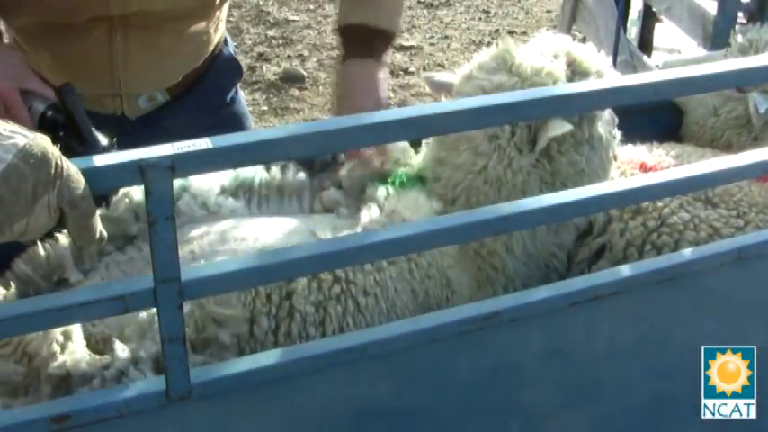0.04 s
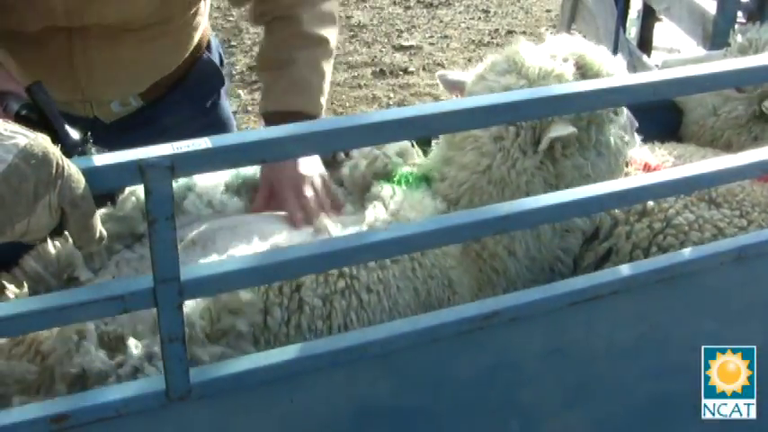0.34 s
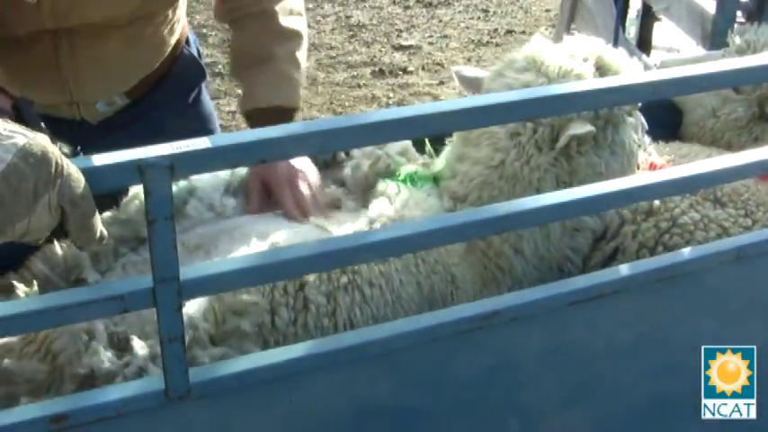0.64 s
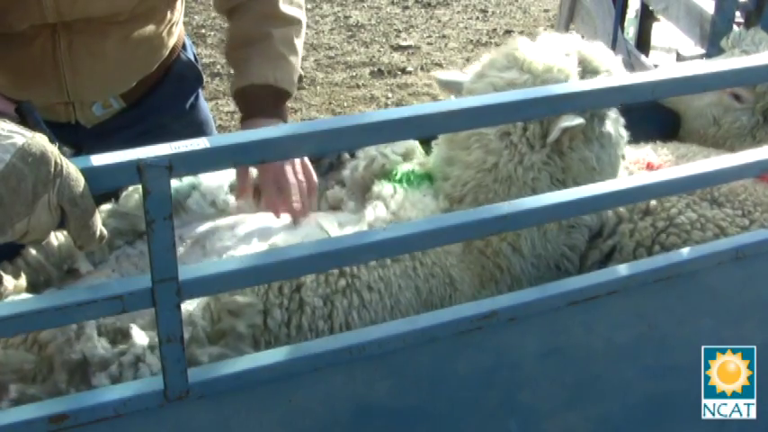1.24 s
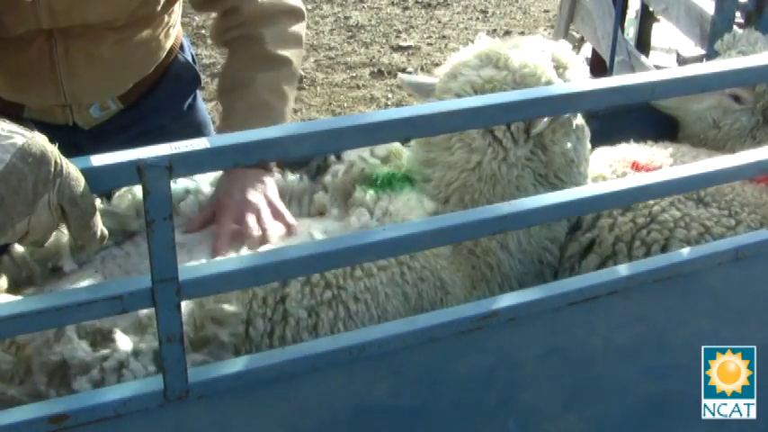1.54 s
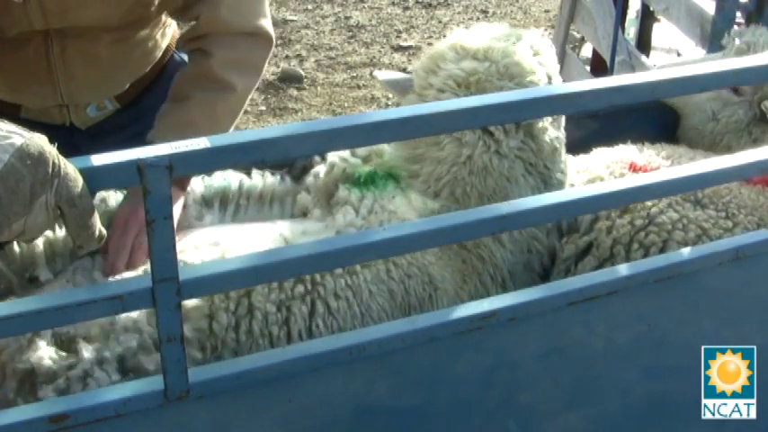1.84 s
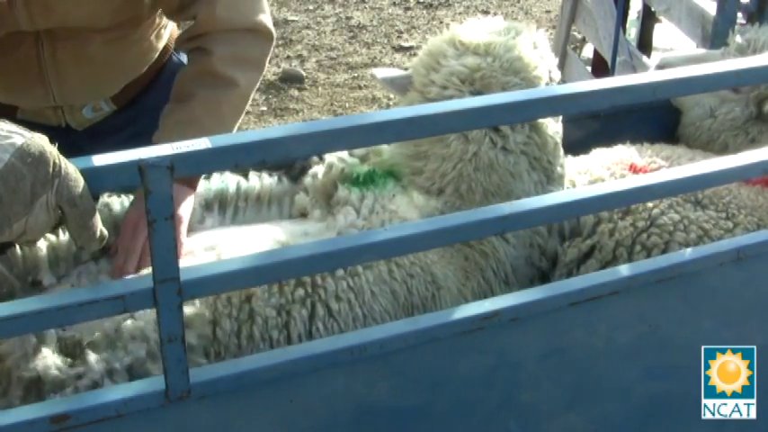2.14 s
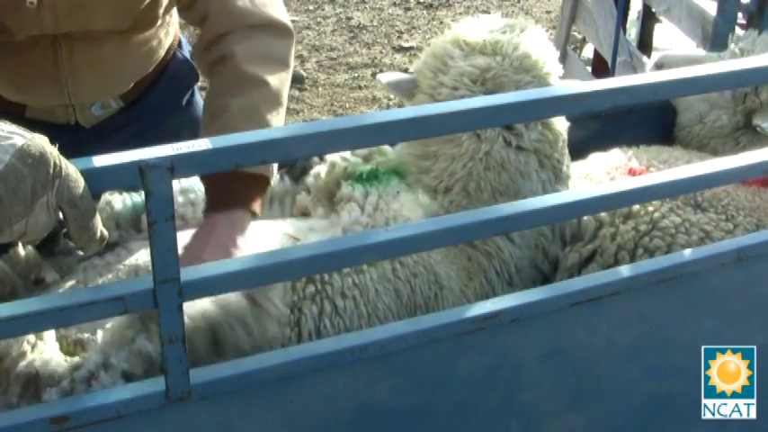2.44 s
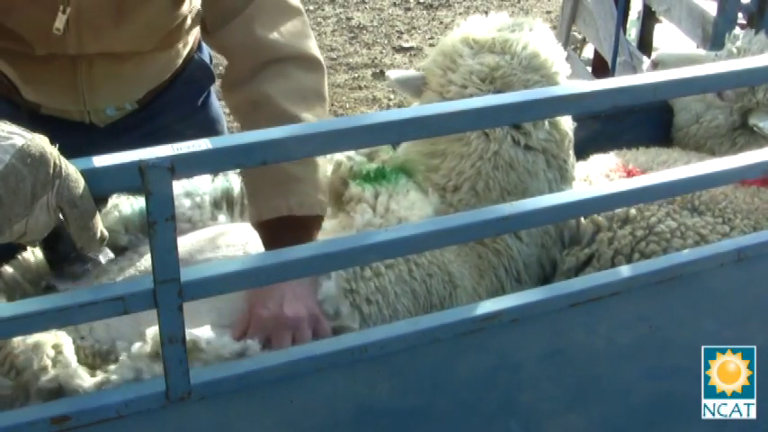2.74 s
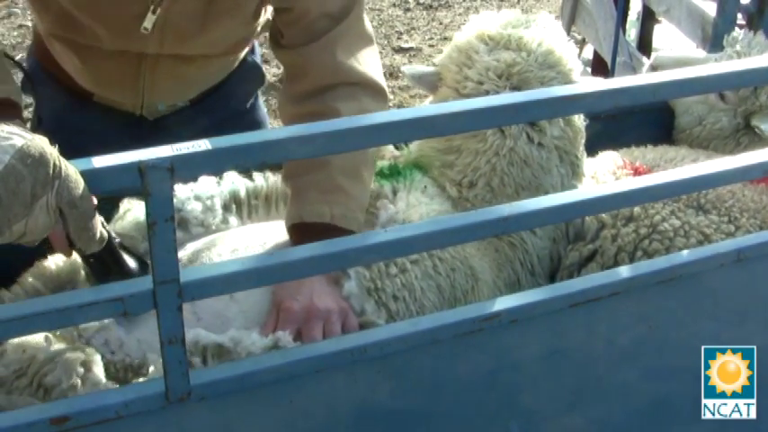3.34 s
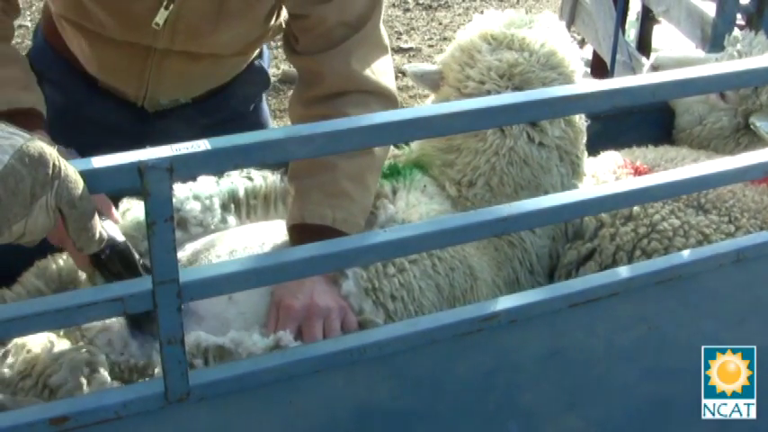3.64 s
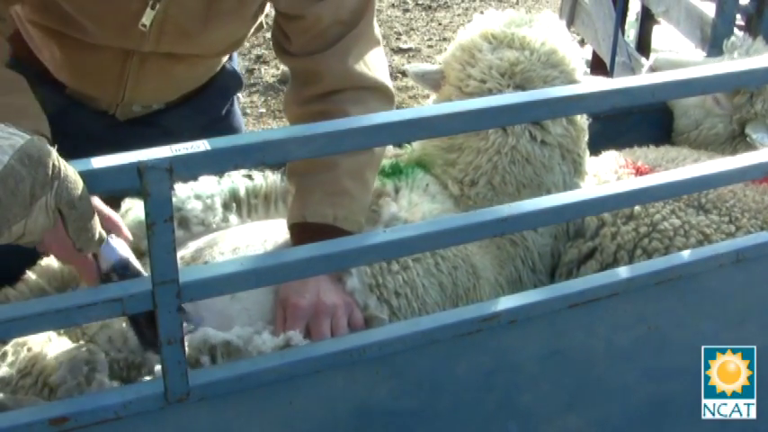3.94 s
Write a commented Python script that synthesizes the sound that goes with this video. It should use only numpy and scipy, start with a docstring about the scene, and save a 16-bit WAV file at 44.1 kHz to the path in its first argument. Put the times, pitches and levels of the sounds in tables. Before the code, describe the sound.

Electric sheep shears run close by throughout, with a steady high motor whine over a fast, rasping metallic buzz. From about 2.3 seconds a coarser rasp swells as the blades cut into wool. Around 3.5 seconds the sound dips for an instant and the whine sags slightly, then recovers. Wind rumbles on the microphone in uneven gusts, strongest from about 3.3 seconds to near the end.

```python
"""An outdoor pen, with electric sheep shears running close by.
The motor fan whines at its blade-passing frequency. A reduction gear drives the cutter to and fro
over the comb: sliding friction rasps, and impacts knock in every stroke. The motor slows under load
as the blades bite into the fleece. Turbulent gusts of wind rumble on the microphone."""
import sys
import numpy as np
from scipy import signal
from scipy.fft import rfft, irfft
from scipy.io import wavfile
from scipy.ndimage import uniform_filter1d

SR = 44100
rng = np.random.default_rng(int(sys.argv[2]) if len(sys.argv) > 2 else 0)


def wrap_up_sound(samples):
    """Save the sound to the file named by the first command line argument, as 16-bit audio."""
    columns = np.atleast_2d(samples).T
    # keep every value between -1 and 1, then stretch to whole-number steps
    tamed = np.clip(columns, -1, 1)
    steps = np.round(tamed * 32767).astype(np.int16)
    wavfile.write(sys.argv[1], SR, steps)


N = 176400

# Blade-passing frequency of the fan, proportional to motor speed (t/s, f/Hz)
FAN_PITCH = [(0, 2841), (.25, 2851), (.45, 2849), (.75, 2855), (1.15, 2850), (1.38, 2860), (1.7, 2855),
             (2.0, 2856), (2.2, 2861), (2.49, 2849), (2.7, 2860), (3.02, 2858), (3.4, 2836), (3.55, 2818),
             (3.68, 2821), (3.9, 2851), (4, 2853)]
# Relative level of the whine as the handpiece turns (t/s, level/dB)
FAN_LEVEL = [(0.0, -29.5), (0.03, -34), (0.09, -30.5), (0.38, -35), (0.52, -32), (0.96, -32.5), (1.06, -34),
             (1.15, -32), (1.22, -35), (1.45, -33.5), (1.6, -30), (1.78, -29.5), (1.98, -32.5), (2.27, -30),
             (2.48, -35), (2.54, -32), (2.68, -37.5), (2.75, -35), (2.83, -39), (2.99, -29.5),
             (3.15, -37.5), (3.29, -31), (3.42, -32), (3.44, -36.5), (3.48, -36), (3.51, -40),
             (3.66, -40.5), (3.91, -32), (4.0, -32)]
# Harmonics of the shaft rate, relative to the whine (harmonic number, level/dB)
SHAFT_HARMONICS = [(1, -33), (6, -32), (8, 1.5), (24, -32)]
# The fan tone's octave, which beams differently (t/s, level/dB)
FAN_OCTAVE_LEVEL = [(0, -47), (.25, -45), (.42, -57), (.65, -50), (.85, -62), (1.3, -52), (1.55, -52),
                    (1.75, -47.5), (2.03, -45.5), (2.15, -50.5), (2.3, -47), (2.65, -52), (2.85, -50),
                    (3.05, -49.5), (3.3, -53), (3.55, -49), (4, -57)]
# Spectral shape of the fan's airflow (f/Hz, level/dB)
AIR_SPECTRUM = [(200, -17), (420, -14), (650, -4.5), (1000, -1), (1400, 0.5), (2200, -5), (5000, -24)]
# Gear hum at harmonics of the stroke rate (harmonic number, level/dB)
GEAR_HARMONICS = [(11, -72), (16, -70), (22, -58), (24, -66)]
# Contacts of cutter and comb in each stroke (place/strokes, width/strokes, relative level/dB)
STROKE_CONTACTS = [(.36, 0.11, -2), (0.732, 0.19, -6), (.87, 0.051, 1)]
# Spectral shape of the steel blades (f/Hz, level/dB)
BLADE_SPECTRUM = [(150, -30), (420, -23.5), (650, -15.5), (1050, -13.5), (1450, -8.5), (1780, -9.5),
                  (2080, -8), (2800, 1.5), (3550, -3.5), (3950, -4.5), (4400, -4.5), (5100, -9), (5650, -7),
                  (6100, -12.5), (6600, -8), (8300, -13), (11500, -16.5), (15500, -29)]
# Relative level of rasp and knocks together (t/s, level/dB)
BLADE_LEVEL = [(0, -34), (.5, -36), (1.4, -35), (2.2, -37), (2.45, -36), (2.75, -37.5), (3.1, -36),
               (3.5, -36.5), (3.8, -33.5), (4, -34)]
# Their top treble, relative to the rest (t/s, level/dB)
TREBLE_LEVEL = [(0, 2), (.7, 2.5), (1.5, 0), (2.4, 1.5), (2.75, -0.5), (3.1, 2), (4, -2.5)]
# Lasting resonances of the cutting head (f/Hz, bandwidth/Hz, level/dB)
LASTING_MODES = [(1810, 200, -46), (3315, 240, -45.5), (3574, 230, -45), (4320, 290, -51),
                 (6700, 1000, -53)]
# Resonances that swell as the blades change angle (t/s, spread/s, f/Hz, bandwidth/Hz, level/dB)
PASSING_MODES = [(0.047, .12, 10500, 900, -53), (.36, .13, 5270, 200, -46), (1.4, 0.12, 6440, 110, -48.5),
                 (2.418, 0.14, 2300, 300, -38.5), (2.466, 0.087, 4140, 450, -39),
                 (3.79, 0.042, 4540, 600, -41), (3.918, .12, 7360, 500, -49)]
# Relative strength of the wind (t/s, level/dB)
GUST_LEVEL = [(0.0, -36), (0.2, -47), (0.27, -34), (0.31, -39), (0.34, -32), (0.49, -44.5), (0.51, -37),
              (0.57, -54), (0.69, -28), (0.71, -35.5), (0.82, -40), (1.07, -29.5), (1.19, -39),
              (1.24, -28.5), (1.31, -33), (1.36, -44.5), (1.49, -35.5), (1.55, -48), (1.63, -28.5),
              (1.7, -31), (1.74, -35), (1.82, -36.5), (1.86, -45), (1.9, -37.5), (1.94, -44), (1.96, -32),
              (2.04, -30), (2.19, -46), (2.25, -32), (2.36, -43), (2.66, -44.5), (2.7, -37), (2.74, -45),
              (2.82, -42), (2.85, -48), (2.93, -38), (2.99, -42), (3.04, -28.5), (3.06, -41), (3.11, -33.5),
              (3.19, -31.5), (3.22, -41), (3.27, -26.5), (3.33, -21), (3.36, -32), (3.45, -30.5),
              (3.49, -38.5), (3.56, -26), (3.89, -27.5), (4.0, -38.5)]
# Spectral shape of slow buffeting (f/Hz, level/dB)
BUFFET_SPECTRUM = [(10, -11), (25, 8), (50, 5), (90, -3), (150, -20), (300, -36.5), (700, -55)]
# Spectral shape of faster eddies (f/Hz, level/dB)
EDDY_SPECTRUM = [(25, -11), (50, -5.5), (80, 6), (115, -0.5), (170, -7.5), (260, -19), (400, -31),
                 (900, -53)]
# Relative level of the coarse rasp in the wool (t/s, level/dB)
WOOL_LEVEL = [(0, -54), (2.2, -55), (2.4, -44), (2.8, -41.5), (3.1, -44), (3.5, -41), (3.8, -39.5),
              (4, -40)]
# Spectral shape of that rasp (f/Hz, level/dB)
WOOL_SPECTRUM = [(300, -23.5), (800, -15.5), (1400, -10), (1950, 5.5), (2300, -1.5), (2700, -23),
                 (4200, -4), (6000, -32)]

FAN_BLADES, TURNS_PER_STROKE = 8, 47 / 6
CONTACT_SCATTER_DB, MAX_STROKES = 1.83, 256


def undb(db):
    """Amplitude ratio of a level in decibels."""
    return 10 ** (np.asarray(db) / 20)


def unit(x):
    """Normalisation to rms 1."""
    return x / np.sqrt(np.mean(x ** 2))


def curve(rows):
    """Linear interpolation of (t/s, value) rows."""
    return np.interp(np.arange(N) / SR, *np.array(rows).T)


def colour(x, spectrum):
    """Spectral shaping by (f/Hz, level/dB) rows; rms 1."""
    hz, db = np.array(spectrum).T
    f = np.maximum(np.arange(N // 2 + 1) * SR / N, 1)
    return unit(irfft(rfft(x) * undb(np.interp(np.log(f), np.log(hz), db)), N))


def wander(rate_hz):
    """Moving averages smooth random steps into a drift of rms 1."""
    hold = max(int(SR / rate_hz), 2)
    steps = np.repeat(rng.standard_normal(N // hold + 1), hold)
    return unit(uniform_filter1d(uniform_filter1d(steps, hold), hold)[:N])


def motor_whine(shaft, stroke):
    """Modulation: each swing of the cutter sways the fan and shaft tones in amplitude and phase."""
    lag_strokes, sway_rad = 0.52, 0.066
    swing = 2 * np.pi * (stroke - lag_strokes)
    sway = 1 + 0.31 * np.cos(2 * swing) - 0.1 * np.cos(swing)
    phase = 2 * np.pi * shaft - sway_rad * np.sin(2 * swing) / FAN_BLADES
    tones = sum(undb(db + 0.07 * wander(60)) * np.sin(k * phase) for k, db in SHAFT_HARMONICS)
    octave = np.sin(2 * FAN_BLADES * phase) * undb(curve(FAN_OCTAVE_LEVEL))
    return np.sqrt(2) * sway * (tones * undb(curve(FAN_LEVEL) + 1) + octave)


def fan_air():
    """Turbulence in the fan's airflow radiates a smooth broadband rush."""
    return undb(-44.5) * colour(rng.standard_normal(N), AIR_SPECTRUM)


def gear_hum(stroke):
    """Periodic meshing gives faint, wavering harmonics of the stroke rate."""
    return np.sqrt(2) * sum(undb(db + 3 * wander(6.23)) * np.sin(2 * np.pi * k * stroke)
                            for k, db in GEAR_HARMONICS)


def friction_envelope(stroke):
    """Incoherent sources add in power: a steady slide and an uneven surge at each contact."""
    power = undb(-5.5) ** 2
    for place, width, db in STROKE_CONTACTS:
        cycle = stroke - place + 1.5  # each surge peaks in mid-cycle
        sizes = undb(db + CONTACT_SCATTER_DB * rng.standard_normal(MAX_STROKES))
        surge = sizes[cycle.astype(int)] * np.exp(-.5 * ((cycle % 1 - .5) / width) ** 2)
        power = power + surge ** 2
    return np.sqrt(power)


def rasp(friction, spectrum):
    """Sliding friction on rough surfaces makes noise with a fast, gritty flutter; rms 1."""
    return colour(friction * rng.standard_normal(N) * undb(2 * wander(2500)), spectrum)


def knocks(stroke):
    """Impulse response: a contact strikes the steel head, which rings alike in every stroke."""
    decay_s, jitter_s, low_cut_hz = 0.0026, .00012, 1920
    t, rings = np.arange(N) / SR, 0
    for place, _, db in STROKE_CONTACTS:
        times = np.interp(np.arange(int(stroke[-1])) + place, stroke, t)
        late, scatter = rng.standard_normal((MAX_STROKES, 2))[:len(times)].T
        onsets = np.clip((times + jitter_s * late) * SR, 0, N - 1).astype(int)
        impacts = np.bincount(onsets, undb(db + CONTACT_SCATTER_DB * scatter), N)
        response = rng.standard_normal(2048) * np.exp(-t[:2048] / decay_s)
        rings = rings + signal.fftconvolve(impacts, response)[:N]
    highpass = signal.butter(2, low_cut_hz, "high", fs=SR, output="sos")
    return colour(signal.sosfilt(highpass, rings), BLADE_SPECTRUM)


def blades(friction, stroke):
    """Superposition: rasp and knocks sound from the same steel, whose top treble rises and falls."""
    steel = (rasp(friction, BLADE_SPECTRUM) + undb(-7.5) * knocks(stroke)) * undb(curve(BLADE_LEVEL))
    treble = signal.sosfiltfilt(signal.butter(2, 8000, "high", fs=SR, output="sos"), steel)
    return steel + treble * (undb(curve(TREBLE_LEVEL)) - 1)


def head_ringing(friction):
    """Resonance: friction drives the modes of the head, which swell and fade as the blades move."""
    def mode(hz, width):
        band = signal.butter(1, [hz - width / 2, hz + width / 2], "band", fs=SR, output="sos")
        return unit(signal.sosfilt(band, friction * rng.standard_normal(N)))

    t = np.arange(N) / SR
    lasting = sum(mode(hz, width) * undb(db + 1.5 * wander(5.94)) for hz, width, db in LASTING_MODES)
    passing = sum(mode(hz, width) * undb(db) * np.exp(-.5 * ((t - at) / spread) ** 2)
                  for at, spread, hz, width, db in PASSING_MODES)
    return lasting + passing


def wind():
    """Turbulent pressure buffets the microphone; faster eddies take over in strong gusts."""
    def even_noise(spectrum):
        noise = colour(rng.standard_normal(N), spectrum)
        return noise / np.sqrt(uniform_filter1d(noise ** 2, size=3500))

    gust_db = curve(GUST_LEVEL) + 32.5  # relative to a moderate gust
    buffet = even_noise(BUFFET_SPECTRUM) * undb(-33.5 + 0.76 * gust_db)
    eddies = even_noise(EDDY_SPECTRUM) * undb(-35 + 1.41 * gust_db)
    return buffet + eddies


def wool_bite(friction):
    """Friction in the fleece adds a coarser rasp, which swells after 2.2 s."""
    return rasp(friction, WOOL_SPECTRUM) * undb(curve(WOOL_LEVEL))


def scene():
    """Mechanical coupling: one shaft drives fan, gears and cutter; wind blows over it all."""
    fan_hz = curve(FAN_PITCH) * (1 + .0007 * wander(40))
    shaft = np.cumsum(fan_hz) / SR / FAN_BLADES  # elapsed turns
    stroke = shaft / TURNS_PER_STROKE  # elapsed strokes
    drive = fan_air() + motor_whine(shaft, stroke) + gear_hum(stroke)
    friction = friction_envelope(stroke)
    cutter = blades(friction, stroke) + wool_bite(friction) + head_ringing(friction)
    return (drive + cutter + wind())[None]


def record(dry):
    """Attenuation: all but the deepest rumble dips briefly once, and a low-pass cuts the top."""
    dip_s, fall_s, rise_s, dip_db = 3.477, .017, .009, -15
    since = np.arange(N) / SR - dip_s
    dip = undb(dip_db * np.exp(-(since / np.where(since < 0, fall_s, rise_s)) ** 2))
    rumble = signal.sosfiltfilt(signal.butter(2, 50, fs=SR, output="sos"), dry)
    lowpass = signal.ellip(12, .2, 80, 15600, fs=SR, output="sos")
    return signal.sosfilt(lowpass, rumble + (dry - rumble) * dip)


dry = scene()
out = record(dry)
wrap_up_sound(out)
```